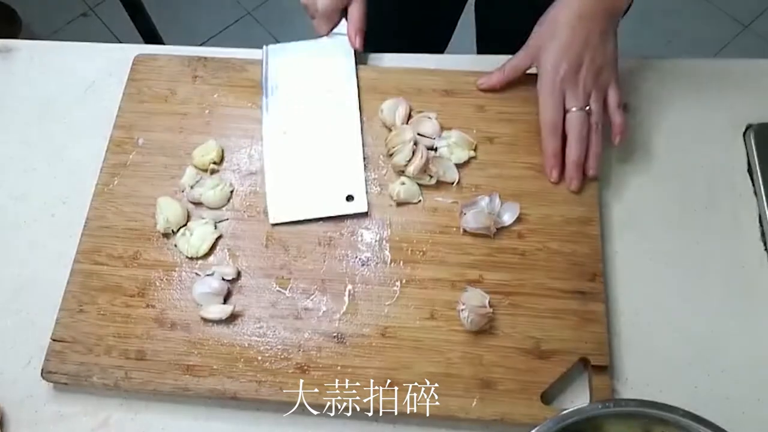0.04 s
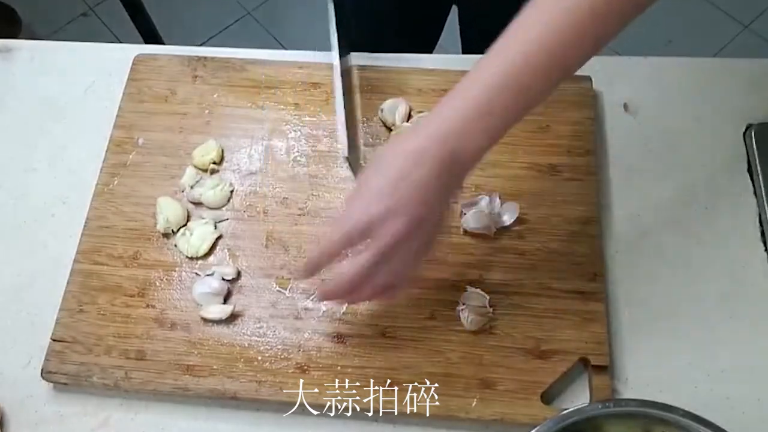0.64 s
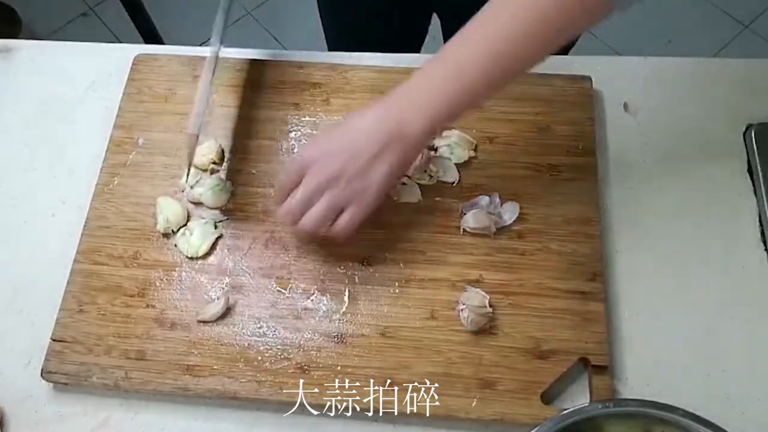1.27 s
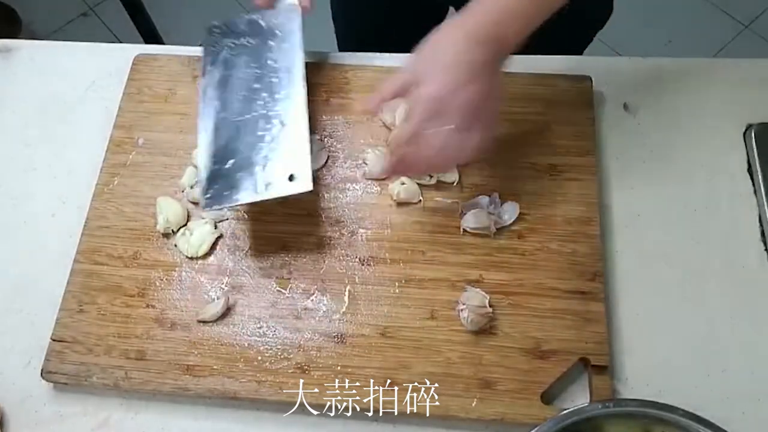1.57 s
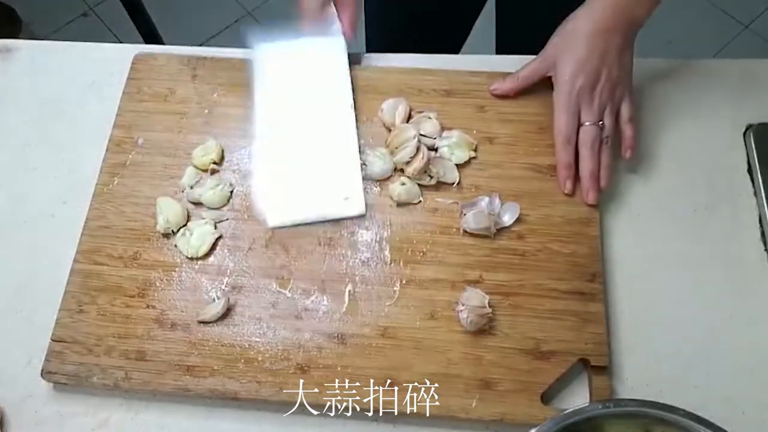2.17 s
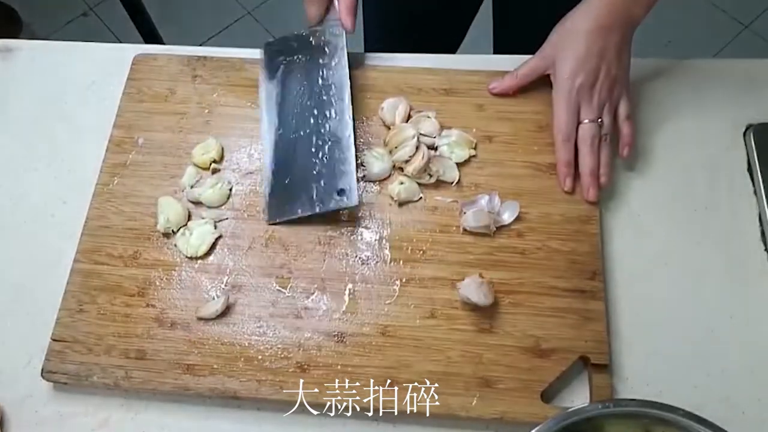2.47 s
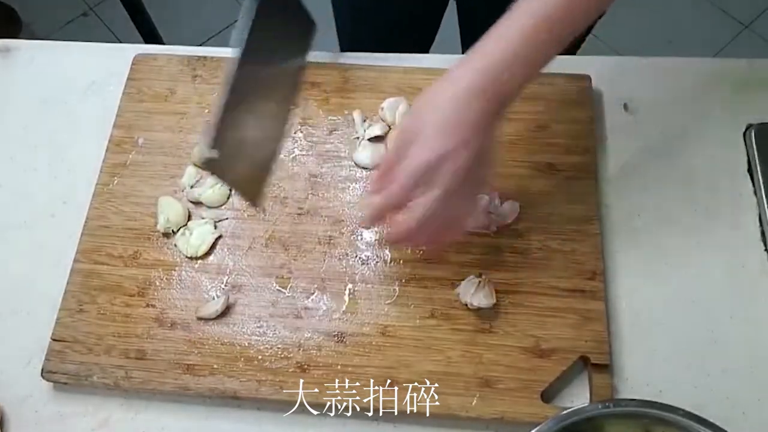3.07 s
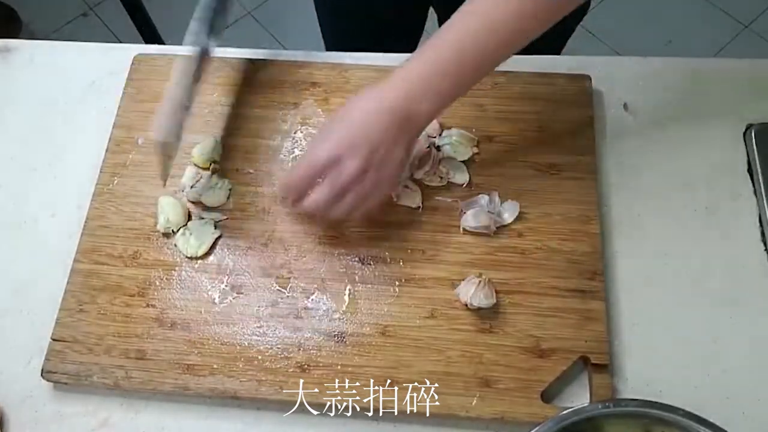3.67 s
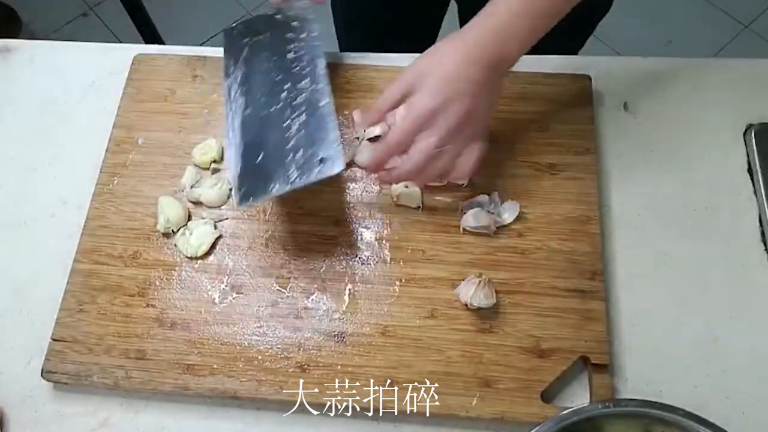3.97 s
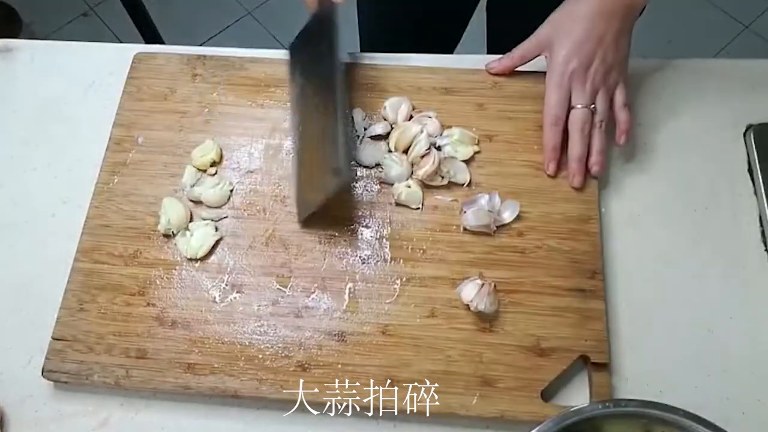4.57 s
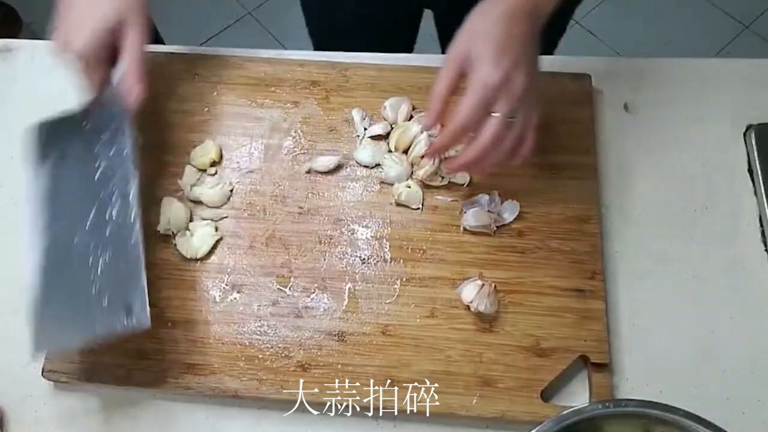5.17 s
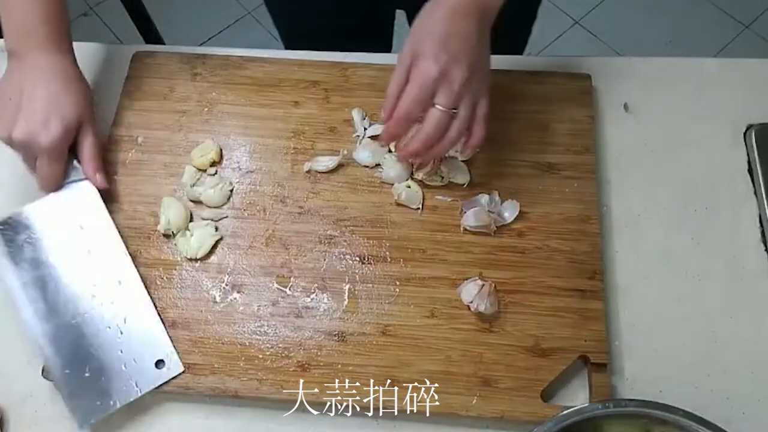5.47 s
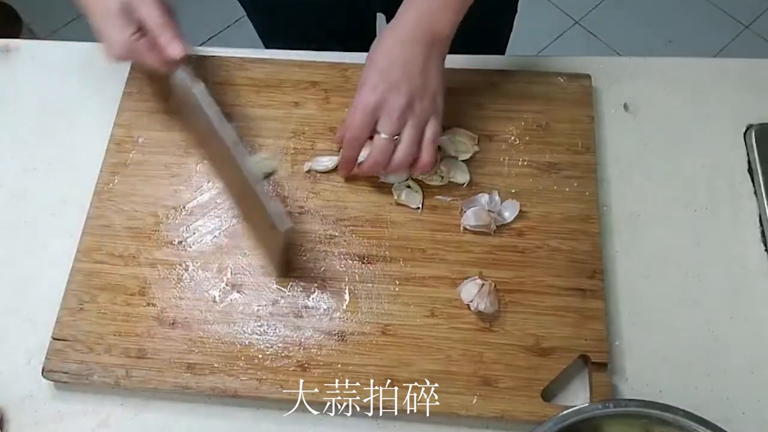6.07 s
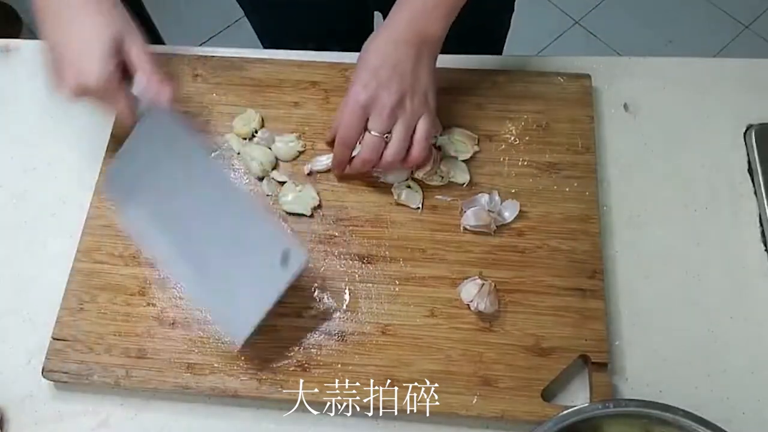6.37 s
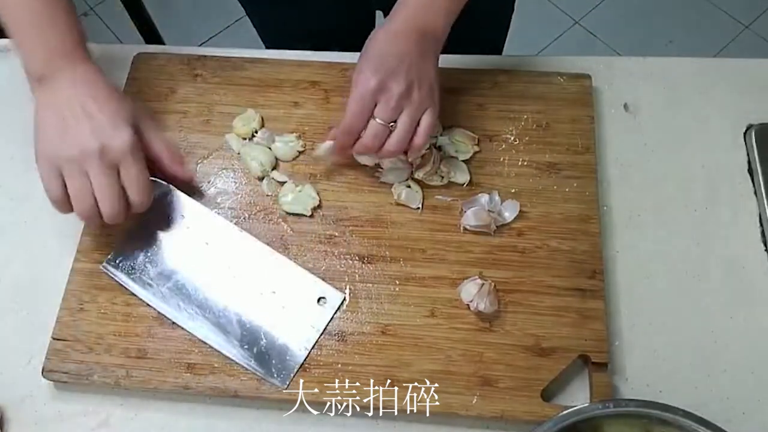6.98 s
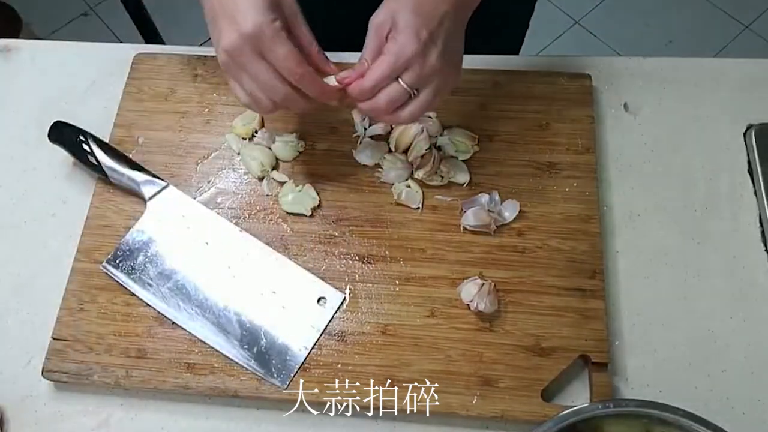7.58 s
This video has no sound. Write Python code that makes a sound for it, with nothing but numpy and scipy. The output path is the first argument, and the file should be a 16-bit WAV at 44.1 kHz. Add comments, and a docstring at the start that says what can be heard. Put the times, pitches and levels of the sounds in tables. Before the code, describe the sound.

In a small tiled kitchen, a cleaver lightly taps and scrapes a wooden board. A moderate smack comes first, then a very loud whack crushes a garlic clove, ringing the steel and thumping the table. Another hard whack follows two seconds later. Lighter knocks and a short scrape lead to the blade being set down with a clunk, and dry skins snap faintly. The microphone is close.

```python
"""Smashing garlic with a cleaver

The flat of a steel cleaver crushes garlic on a bamboo board in a small tiled kitchen. Each blow claps,
rings the blade and thumps the table. The blade also scrapes the cloves aside and is laid down, and dry
skins rustle under the fingers. A limiter ducks on the big blows and lets the room swell back."""
import sys
import numpy as np
from scipy import signal
from scipy.fft import rfft, irfft
from scipy.io import wavfile
from scipy.ndimage import uniform_filter1d, minimum_filter1d

SR = 44100
rng = np.random.default_rng(int(sys.argv[2]) if len(sys.argv) > 2 else 0)


def wav_out(sig):
    """Save sig, one row per channel (or a flat mono array), as 16-bit PCM at SR to the path in sys.argv[1]."""
    wavfile.write(sys.argv[1], SR, np.round(np.clip(np.atleast_2d(sig).T, -1, 1) * 32767).astype(np.int16))


N = 345303
TIME = np.arange(N) / SR
AGE = TIME[:SR]  # each event lasts at most one second


def undb(db):
    """Decibels to gain."""
    return 10 ** (np.asarray(db) / 20)


def unit(x):
    """Scale to rms 1."""
    return x / np.sqrt(np.mean(x ** 2))


def unit_onset(x):
    """Scale the sound so that its first 10 ms have rms 1."""
    return x / np.sqrt(np.mean(x[:SR // 100] ** 2))


def fade(t60_s):
    """Exponential decay, 60 dB in t60_s."""
    return np.exp(-np.log(1000) * AGE / t60_s)


def rise(tau_s):
    """Exponential approach from 0 to 1."""
    return 1 - np.exp(-AGE / tau_s)


def add(track, start_s, sound):
    """Mix a sound into the track."""
    i = max(int(start_s * SR), 0)
    track[i:i + len(sound)] += sound[:N - i]


def waver(count, rate_hz):
    """Random drift with a spread near 1."""
    knots = rng.standard_normal(400)
    return np.interp(np.arange(count) * rate_hz / SR, np.arange(len(knots)), knots)


def on_log_axis(points, hz):
    """Interpolate (Hz, value) points over log frequency."""
    point_hz, value = np.transpose(points)
    return np.interp(np.log(hz + 1), np.log(point_hz), value)


def colour(x, points):
    """Minimum-phase filter through (Hz, dB) points, rolling off below the first."""
    size = 8192
    hz = np.arange(size // 2 + 1) * SR / size
    gain = undb(on_log_axis(points, hz)) * np.minimum((hz + 1) / points[0][0], 1) ** 2
    cepstrum = irfft(np.log(gain))
    cepstrum[1:size // 2] *= 2
    cepstrum[size // 2 + 1:] = 0
    response = irfft(np.exp(rfft(cepstrum)))
    return signal.fftconvolve(x, response)[:len(x)]


def cushion(x, cutoff_hz, order):
    """A soft contact lasts longer and leaves out the treble."""
    return signal.sosfilt(signal.butter(order, min(cutoff_hz, SR / 3), fs=SR, output="sos"), x)


def diffuse(count, apart_hz=520):
    """Noise from all sides: the two microphones agree in the bass only."""
    mid, side = rfft(rng.standard_normal((2, count)))
    width = np.minimum(np.arange(len(mid)) * SR / count / apart_hz, 1)
    pair = np.array([mid + width * side, mid - width * side])
    return irfft(pair / np.sqrt(1 + width ** 2), count)


# Spectrum of the quiet kitchen. Each row: frequency in Hz, level in dB.
HUSH_SPECTRUM = [(12, -32.5), (20, -2.5), (43, 2.5), (143, -3.5), (205, -8.5), (235, -21), (367, -12.5),
                 (398, -24.5), (1080, -18), (1270, -19), (1390, -18.5), (2620, -20.5), (4310, -31.5),
                 (11400, -41), (15000, -72)]


def kitchen_hush(level_db=-61):
    """A faint steady rumble and hiss fills the kitchen."""
    air = np.array([colour(side, HUSH_SPECTRUM) for side in diffuse(N, apart_hz=880)])
    return air / np.std(air.mean(axis=0)) * undb(level_db)


def ring(modes, scatter_db, waver_hz):
    """Struck modes: the contact point sets each one's strength and sign, the changing grip bends it."""
    out = np.zeros(SR)
    for hz, db, t60_s in modes:
        scatter, sign = rng.standard_normal(2)
        decay = fade(t60_s)[:int(1.3 * SR * t60_s) + 1]
        phase = 2 * np.pi * np.cumsum(hz + waver_hz * waver(len(decay), rate_hz=35)) / SR
        out[:len(decay)] += np.sign(sign) * undb(db + scatter_db * scatter) * decay * np.sin(phase)
    return out


# Blade modes. Each row: frequency in Hz, level in dB struck on the flat, the same on the edge, t60 in s.
BLADE_MODES = [(887, -3, -11.5, 0.25), (887.6, -5.5, -18.5, 0.22), (1113, -9, -2, 0.48),
               (1240, -10, -6.5, .2), (1635, 1.5, -9.5, 0.12), (1640, -4.5, -10, 0.58),
               (1786, -8.5, -2.5, 0.73), (1884, -1, 1.5, 0.59), (2070, -4, -13, 0.12),
               (2128, 3, -13.5, 0.24), (2230, -6, -9.5, 0.15), (2430, -14, -10.5, 0.22),
               (2550, 8.5, -11, 0.22), (2780, 4, -20.5, 0.13), (3280, -5.5, -16.5, .3),
               (3710, -10, -20, 0.22), (4460, -6, 1, 0.36), (4850, -9, -6.5, 0.41), (5300, -6.5, -4, 0.6),
               (6150, -6, -15, 0.32), (6852, -11.5, 2, 0.38), (7430, -5.5, -5.5, 0.24),
               (7300, -5.5, -10, 0.21), (7990, -18, -4.5, 0.29), (8960, -9.5, -16, 0.19),
               (9330, -18, -19.5, .35), (10250, -24.5, -23.5, .4), (11450, -26.5, -26, 0.37)]


def blade(edge, t60_scale):
    """The edge (1) wakes other modes than the flat (0); pulp or a firm grip shortens the ring."""
    modes = [(hz, (1 - edge) * flat_db + edge * edge_db, t60_s * t60_scale)
             for hz, flat_db, edge_db, t60_s in BLADE_MODES]
    return ring(modes, scatter_db=2.5, waver_hz=8)


# Modes of the table under the board. Each row: frequency in Hz, level in dB, t60 in seconds.
TABLE_MODES = [(44, -4, 0.22), (69.5, -1, 0.22), (114.6, -11.5, 0.7), (142, -1, 0.17), (165, -4, 0.14),
               (180.2, 0, 0.17), (275.4, -2, 0.15), (354, -9.5, 0.033)]


def table_thump(pitch_hz, focus_db_per_octave=7):
    """The heavy table starts slowly; a push moves its low modes, a quick tap its higher ones."""
    modes = [(hz, db - focus_db_per_octave * abs(np.log2(hz / pitch_hz)), t60_s)
             for hz, db, t60_s in TABLE_MODES]
    return unit_onset(ring(modes, scatter_db=1, waver_hz=3)) * rise(0.012)


# Spectrum of the struck board. Each row: frequency in Hz, level in dB.
BOARD_SPECTRUM = [(40, -5.5), (200, -7.5), (400, -7), (520, -7.5), (640, -2), (800, 1), (1150, -3),
                  (1900, 3), (2800, -1.5), (3700, -8.5), (5200, -8.5), (7400, -20), (10000, -27),
                  (15000, -39)]


def blow(board_db, contact_hz, clap_db, clap_hz, ring_db, t60_scale, thump_db, thump_hz, edge):
    """The board knocks, the flat claps at a pitch set by how it lands, steel rings, the table follows."""
    give = rise(0.0041)  # the clove yields before the full force arrives
    wood = colour(rng.standard_normal(SR) * fade(0.058) * give, BOARD_SPECTRUM)
    knock = unit_onset(cushion(wood, contact_hz, order=2))
    clap = unit_onset(np.sin(2 * np.pi * clap_hz * AGE) * (fade(0.035) - fade(0.007)))
    steel = unit_onset(cushion(blade(edge, t60_scale) * give, 1.2 * contact_hz, order=2))
    thump = table_thump(thump_hz)
    return undb(board_db) * knock + undb(clap_db) * clap + undb(ring_db) * steel + undb(thump_db) * thump


# Light blade contacts. Each row: start in seconds, board level in dB, contact cut-off in Hz, clap in dB,
# clap pitch in Hz, blade ring in dB, ring t60 factor, table thump in dB, thump pitch in Hz.
BLADE_KNOCKS = [(0.008, -37.5, 3780, -46.5, 610, -48, 0.71, -33.5, 62),
                (0.36, -43.5, 4000, -34, 1246, -47, 0.72, -69, 110),
                (0.401, -58, 2000, -38, 653, -49, 0.42, -47, 105),
                (1.589, -18.5, 3530, -16.5, 1340, -27.5, 0.17, -25.5, 172),
                (4.621, -50.5, 10950, -68, 1400, -69, 0.42, -49.5, 108.9),
                (5.272, -41, 2300, -41.5, 1977, -43.5, .45, -30.5, 228),
                (5.389, -45.5, 2000, -49, 1960, -51.5, .65, -39.5, 277),
                (5.399, -24, 1900, -20, 1236, -38.5, 1, -30, 240),
                (5.62, -43, 9280, -46.5, 1356, -51.5, 1.1, -40, 202),
                (5.684, -41.5, 1954, -57, 1260, -69, .7, -29.5, 185),
                (5.741, -42, 7060, -50, 2420, -45.5, 0.21, -34.5, 170),
                (6.457, -31.5, 3000, -28, 1220, -42.5, 0.84, -37.5, 280),
                (6.482, -25.5, 1950, -29.5, 1280, -39, 0.82, -30.5, 280),
                (6.54, -40.5, 1810, -36, 2263, -53, 0.29, -31.5, 58)]


def knocks():
    """The blade is turned, rested or put down, meeting the board nearer its edge."""
    out = np.zeros(N)
    for start_s, *contact in BLADE_KNOCKS:
        add(out, start_s, blow(*contact, edge=0.55))
    return out


def grains(rate_per_s, spread_db):
    """One second of tiny slips of uneven size at random moments."""
    size = undb(spread_db * np.minimum(rng.exponential(size=SR), 4))
    slipping = rng.random(SR) < rate_per_s / SR
    return unit(slipping * size * rng.standard_normal(SR))


def stroke(length_s, swell_db=20.5, swell_share=0.34, ease_db=5.5, release_db_per_s=298):
    """Hand pressure swells, eases a little as the hand travels, and lets go."""
    progress = AGE / length_s
    swell = swell_db * np.maximum(1 - progress / swell_share, 0)
    ease = ease_db * np.minimum(progress, 1)
    release = release_db_per_s * np.maximum(AGE - length_s, 0)
    return undb(-swell - ease - release)


# Spectra of steel rubbing on bare wood and on pulp. Each row: frequency in Hz, level in dB.
DRY_RUB_SPECTRUM = [(100, -10.5), (170, 5), (300, -18), (650, -4), (880, -3.5), (1150, 7), (1900, -6.5),
                    (2600, -4.5), (3500, -17), (5100, -4.5), (6200, -16), (7500, -24), (10000, -32),
                    (15000, -37)]
WET_RUB_SPECTRUM = [(70, 7), (170, 5.5), (380, -12.5), (650, 0.5), (1250, -5), (1900, -9.5), (2700, 0),
                    (3800, -9.5), (4900, -5.5), (7500, -13), (10000, -16), (15000, -28)]


def stick_slip(pressure, wet, ring_db, t60_scale, judder_db=3, dry_edge=0.35):
    """Steel sticks and slips under an unsteady hand; the slips sound directly and ring the blade."""
    slips = grains(rate_per_s=2400, spread_db=3)
    force = pressure * undb(judder_db * waver(SR, rate_hz=32.5))
    steel = blade(dry_edge + wet * (1 - dry_edge), t60_scale)  # pulp is lifted with the very edge
    singing = signal.fftconvolve(slips * force, steel / np.linalg.norm(steel))[:SR]
    on_pulp = unit(colour(slips, WET_RUB_SPECTRUM))
    on_wood = unit(colour(slips, DRY_RUB_SPECTRUM))
    return unit(wet * on_pulp + (1 - wet) * on_wood) * force + undb(ring_db) * singing


def squeal(pressure, length_s, pitch_hz=1771, waver_hz=9, linger_db=-12, linger_t60_s=1.0):
    """The dragged edge feeds one mode; the longer the stroke, the more it sings on once lifted."""
    lifted_s = np.maximum(AGE - length_s, 0)
    linger = undb(linger_db - 60 * lifted_s / linger_t60_s) * np.minimum(AGE, length_s)
    phase = 2 * np.pi * np.cumsum(pitch_hz + waver_hz * waver(SR, rate_hz=57)) / SR
    return (pressure + linger) * np.sqrt(2) * np.sin(phase)


# Blade strokes. Each row: start in seconds, length in seconds, level in dB, wetness (0 wood, 1 pulp),
# ring relative to the rub in dB, ring t60 factor, squeal in dB.
BLADE_SCRAPES = [(0.109, 0.16, -42.5, 0.59, -3, 0.33, -78), (0.336, 0.065, -40.5, 0.78, 5, 0.41, -43),
                 (2.407, 0.2, -42.5, 0.67, -0.5, 0.43, -70), (5.692, 0.32, -31.5, 0.1, -3, 0.21, -43)]


def scrapes(squeal_lag_s=0.055):
    """The blade slides off pulp and sweeps the cloves aside; its squeal takes a moment to build."""
    out = np.zeros(N)
    for start_s, length_s, db, wet, ring_db, t60_scale, squeal_db in BLADE_SCRAPES:
        pressure = stroke(length_s)
        add(out, start_s, undb(db) * stick_slip(pressure, wet, ring_db, t60_scale))
        add(out, start_s + squeal_lag_s, undb(squeal_db) * squeal(pressure, length_s))
    return out


# Spectra of dry skins and of a pushed clove. Each row: frequency in Hz, level in dB.
SKIN_SPECTRUM = [(500, -16.5), (1500, -1.5), (2500, 2.5), (4000, 4.5), (6500, 7.5), (9000, -5.5),
                 (12000, -11), (15000, -15)]
PUSH_SPECTRUM = [(70, 13.5), (150, -6), (350, -14), (650, -7.5), (1300, -1), (2000, -12.5), (5000, -27.5)]
# Finger strokes on skins and on cloves. Each row: start in seconds, length in seconds, level in dB.
SKIN_RUSTLES = [(0.829, 0.081, -62), (0.901, 0.11, -67.5), (1.037, 0.078, -57.5), (1.174, 0.12, -67.5)]
CLOVE_PUSHES = [(1.062, .11, -48.5), (2.599, .055, -47.5), (3.1, .65, -71.5)]
# Breaking skins. Each row: start in seconds, level in dB.
SKIN_SNAPS = [(0.819, -69), (7.425, -60), (7.631, -54.5), (7.652, -71)]


def peeling(snap_t60_s=0.011):
    """Papery skins crackle and snap; fingertips drag cloves over the wood."""
    out = np.zeros(N)
    for start_s, length_s, db in SKIN_RUSTLES:
        crackle = colour(grains(rate_per_s=3300, spread_db=3.5), SKIN_SPECTRUM)
        add(out, start_s, undb(db) * stroke(length_s) * unit(crackle))
    for start_s, length_s, db in CLOVE_PUSHES:
        drag = colour(grains(rate_per_s=8100, spread_db=-0.5), PUSH_SPECTRUM)
        add(out, start_s, undb(db) * stroke(length_s) * unit(drag))
    for start_s, db in SKIN_SNAPS:
        snap = colour(rng.standard_normal(SR) * fade(snap_t60_s), SKIN_SPECTRUM)
        add(out, start_s, undb(db) * unit_onset(snap))
    return out


# Spectrum of a dull bump. Each row: frequency in Hz, level in dB.
BUMP_SPECTRUM = [(100, -7), (250, -4.5), (450, -9), (750, 3.5), (1000, 1), (1300, 2.5), (1700, -5),
                 (2700, -16.5), (3500, -22.5), (5000, -33)]
# Bumps on the board. Each row: start in seconds, level in dB, table thump in dB, thump pitch in Hz.
BOARD_BUMPS = [(1.303, -54.5, -76, 110), (1.861, -31, -26.5, 59), (2.631, -41.5, -54, 170),
               (6.697, -24, -36.5, 160)]


def bumps(t60_s=0.05, rise_s=0.00091, contact_hz=2900):
    """The handle or a clove bumps the wood: board and table answer, but no steel rings."""
    out = np.zeros(N)
    for start_s, db, thump_db, thump_hz in BOARD_BUMPS:
        impact = rng.standard_normal(SR) * fade(t60_s) * rise(rise_s)
        clunk = cushion(colour(impact, BUMP_SPECTRUM), contact_hz, order=6)
        add(out, start_s, undb(db) * unit_onset(clunk) + undb(thump_db) * table_thump(thump_hz))
    return out


def clove_burst(t60_s=0.036):
    """Skin and flesh tear in a short spray of wet cracks."""
    cracks = grains(rate_per_s=2500, spread_db=3) * fade(t60_s)
    return unit_onset(colour(cracks, SKIN_SPECTRUM))


# Blows on a clove. Each row: start in seconds, board level in dB, clap in dB, clap pitch in Hz,
# blade ring in dB, ring t60 factor, then table thump, clove burst, air puff and first rebound in dB.
CLOVE_SMASHES = [(1.600, -15, -10.5, 2113, -25.5, 0.16, -24, -28, -41.5, -19),
                 (2.068, 21.5, 12.5, 2492, 10, 0.78, -5, 5, 14, -29.5),
                 (4.065, 6, 10, 2227, -3.5, 0.31, -10.5, -5.5, -4.5, -11)]


def smashes(rebounds=2, rebound_gap_s=0.036, rebound_loss_db=10):
    """The flat lands hard, the clove bursts and the springy blade bounces, weaker each time."""
    out = np.zeros(N)
    for row in CLOVE_SMASHES:
        start_s, board_db, clap_db, clap_hz, ring_db, t60_scale, thump_db, burst_db, _, rebound_db = row
        hit = blow(board_db, contact_hz=9000, clap_db=clap_db, clap_hz=clap_hz, ring_db=ring_db,
                   t60_scale=t60_scale, thump_db=thump_db, thump_hz=100, edge=0.05)
        add(out, start_s, hit)
        add(out, start_s + 0.003, undb(burst_db) * clove_burst())
        for k in range(rebounds):
            bounce = blow(board_db=0, contact_hz=2400, clap_db=6, clap_hz=1828, ring_db=-11,
                          t60_scale=0.98, thump_db=-12, thump_hz=100, edge=0.6)
            add(out, start_s + (k + 1) * rebound_gap_s, undb(rebound_db - k * rebound_loss_db) * bounce)
    return out


def air_puffs(width_s=0.0034, lag_s=0.0047):
    """Air is pushed ahead of the blade and sucked back as it stops; only the close microphones feel it."""
    out = np.zeros(N)
    for start_s, *_, puff_db, _ in CLOVE_SMASHES:
        widths = (TIME - start_s - lag_s) / width_s
        push = np.exp(-widths ** 2)
        backflow = np.exp(-(widths / 2 - 1) ** 2) / 3
        out += undb(puff_db) * (backflow - push)
    return out


# Decay of the tiled kitchen. Each row: frequency in Hz, t60 in seconds.
ROOM_DECAY = [(60, 0.68), (200, .42), (600, 0.38), (2000, 0.38), (5000, 0.43), (9000, 0.37), (15000, 0.18)]


def room(x, worktop_db=-3, worktop_t60_s=0.0067, wall_db=-3, wall_rise_s=0.0051):
    """Direct sound, quick reflections off the worktop, then the tail of the tiled walls."""
    noise = rfft(diffuse(SR))
    octave = np.log2(np.maximum(np.arange(noise.shape[1]), 32) / 32)  # above 32 Hz
    walls = np.zeros((2, SR))
    for k in range(10):
        band = irfft(noise * np.maximum(1 - abs(octave - k), 0), SR)
        walls += band * fade(on_log_axis(ROOM_DECAY, 32 * 2 ** k))
    walls *= rise(wall_rise_s)
    worktop = diffuse(SR) * fade(worktop_t60_s)
    response = (undb(wall_db) * unit(walls) + undb(worktop_db) * unit(worktop)) / np.sqrt(SR)
    response[0, 1] += 1  # the direct sound arrives one sample later on the left
    response[1, 0] += 1
    return signal.fftconvolve(x[None], response, axes=1)[:, :N]


def scene(pan_db=0.4):
    """All the work happens on the board, a little louder on the left."""
    work = smashes() + knocks() + bumps() + scrapes() + peeling()
    return room(work) * undb([[pan_db], [-pan_db]]) + air_puffs() + kitchen_hush()


def record(dry, ceiling=0.91, release_db_per_s=78, attack_s=0.0008, top_hz=15300):
    """A limiter ducks at once and recovers steadily; what slips past is clipped, and the top is cut."""
    over_db = 20 * np.log10(np.maximum(abs(dry).max(axis=0) / ceiling, 1))
    recovery_db = release_db_per_s * TIME
    duck_db = np.maximum.accumulate(over_db + recovery_db) - recovery_db
    window = int(attack_s * SR)
    gain = uniform_filter1d(minimum_filter1d(undb(-duck_db), window), window)
    lowpass = signal.ellip(10, 0.2, 80, top_hz, fs=SR, output="sos")
    return signal.sosfilt(lowpass, np.clip(dry * gain, -1, 1))


dry = scene()
out = record(dry)
wav_out(out)
```